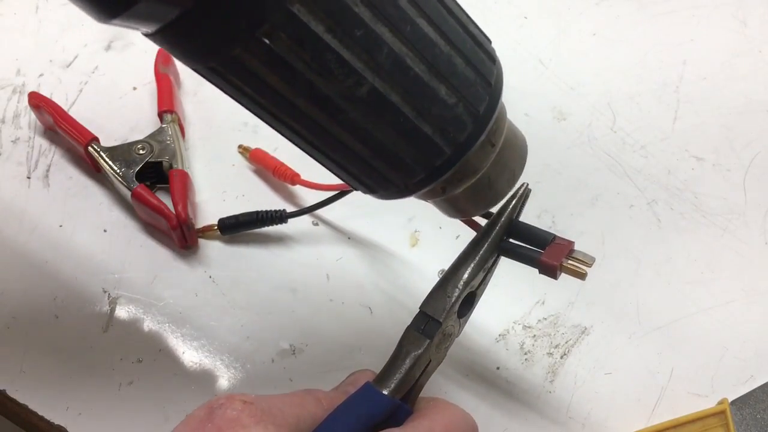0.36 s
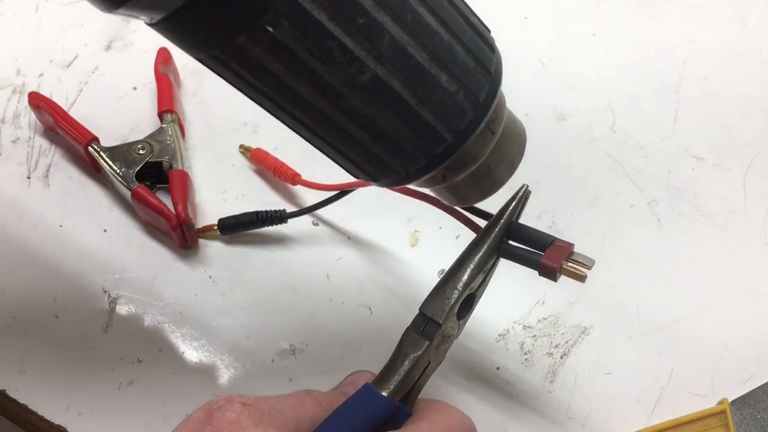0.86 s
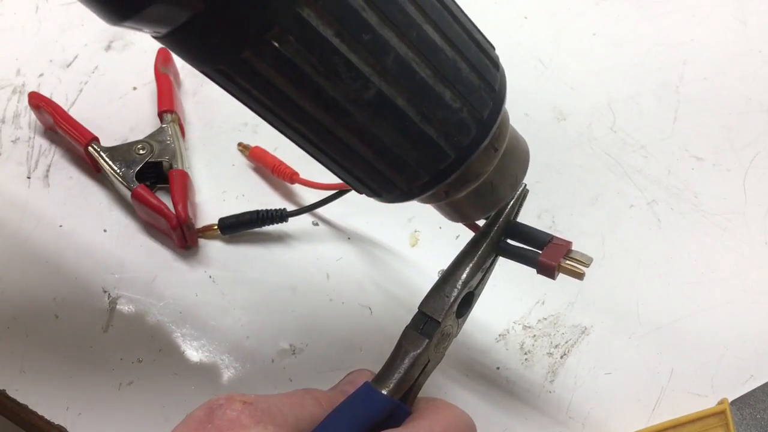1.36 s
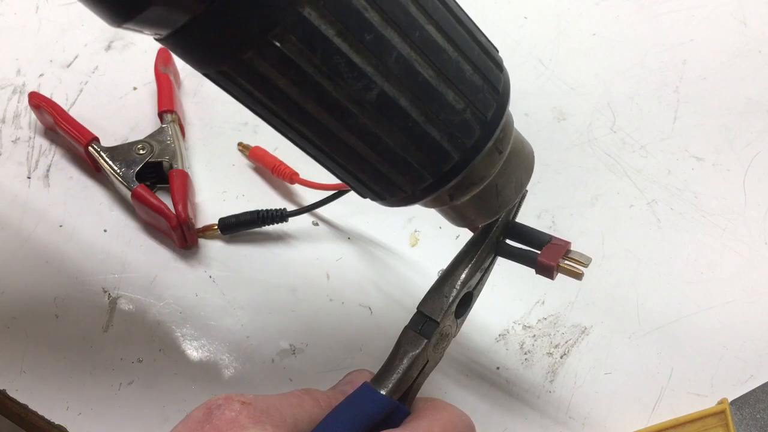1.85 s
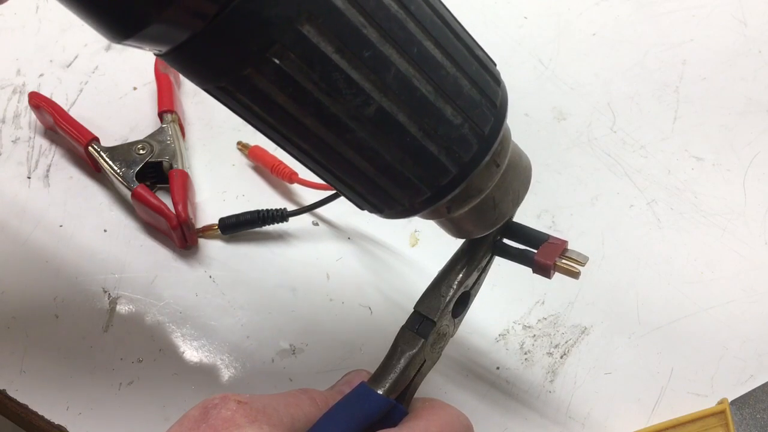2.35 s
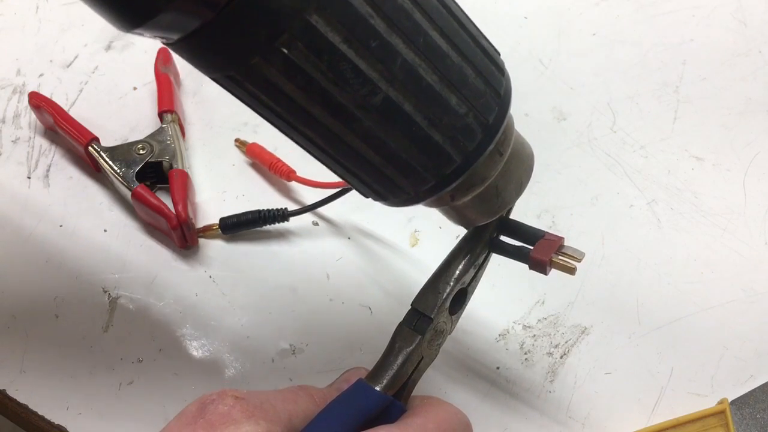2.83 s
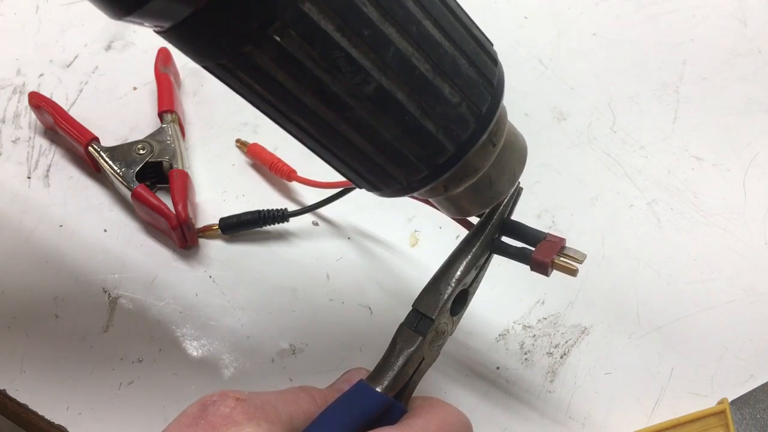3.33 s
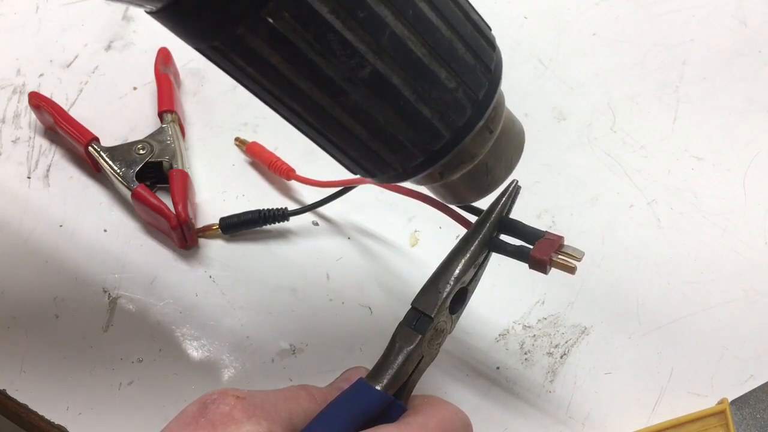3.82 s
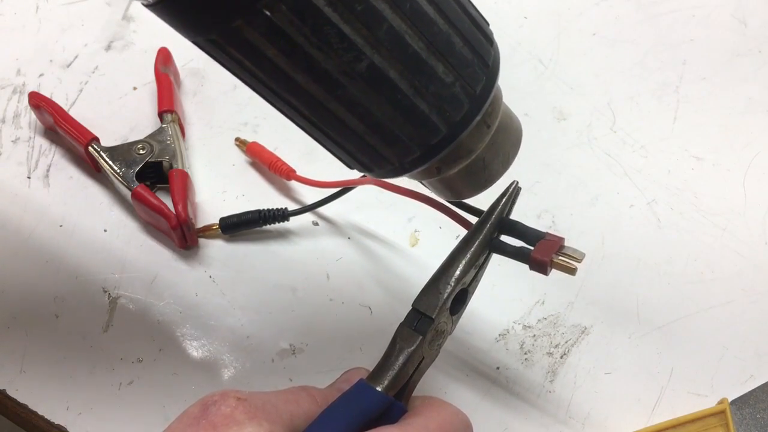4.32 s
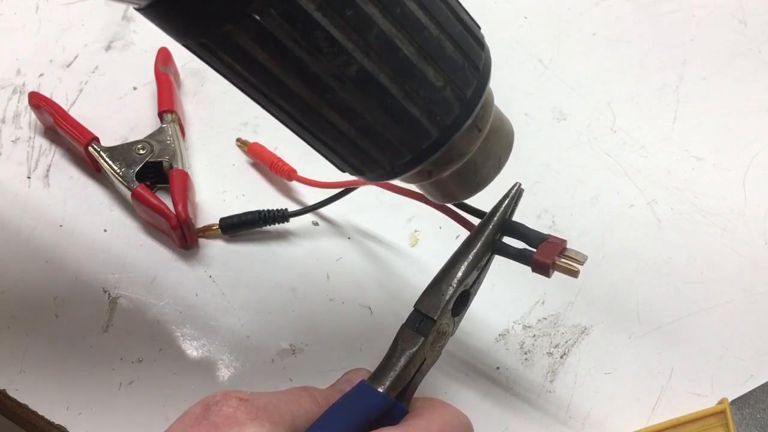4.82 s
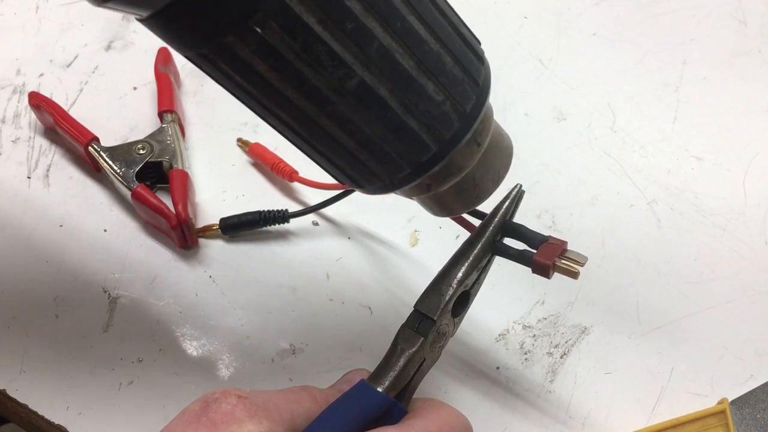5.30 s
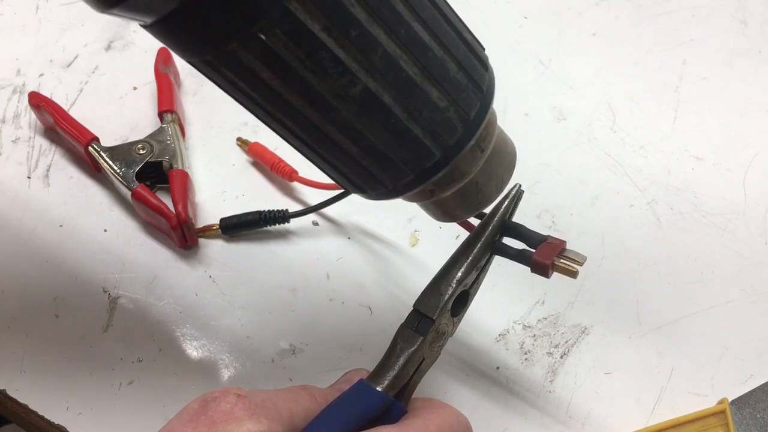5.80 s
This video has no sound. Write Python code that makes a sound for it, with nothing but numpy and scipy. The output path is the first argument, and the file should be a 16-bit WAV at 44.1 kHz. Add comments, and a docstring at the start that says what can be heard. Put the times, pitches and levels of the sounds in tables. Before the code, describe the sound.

Close mono sound of a hot-air blower at constant power: thick, breathy hiss and roar coloured by its barrel, with a low motor hum, a stronger mid-high whine and a fluttering, wavering undertone. Small changes in tone come as the tool is tilted. It starts and ends at full run, with no audible room echo.

```python
"""A steady, close roar of air with a singing motor tone: a hand-held heat gun over a workbench.
The motor slowly loses speed; sine waves at multiples of its shaft speed make the singing.
The rush is random noise, coloured by resonances of the barrel and housing.
A wavering swirl tone beats with the six fan blades, which also chop a narrow band of eddy noise."""
import sys
import numpy as np
from scipy import signal
from scipy.io import wavfile
from scipy.ndimage import uniform_filter1d

SR = 44100
rng = np.random.default_rng(int(sys.argv[2]) if len(sys.argv) > 2 else 0)


def volts_from_db(level):
    """Convert decibel levels to linear amplitude ratios."""
    exponent = np.asarray(level, float) / 20
    return 10 ** exponent


def pcm_store(signal):
    """Save signal as 16-bit PCM."""
    levels = np.round(np.clip(np.atleast_2d(signal), -1, 1) * 32767)
    wavfile.write(sys.argv[1], SR, levels.astype(np.int16).T)


N = 261072  # length in samples

# The motor sags as it warms, with brief recoveries.
# Each row: time in seconds, shaft speed in turns per second (Hz).
SHAFT_SPEED = [(0, 295.4), (.4, 294.92), (.85, 294.0), (1.1, 293.87), (1.28, 294.18), (1.55, 293.85),
               (1.9, 293.72), (2.1, 293.2), (2.4, 292.97), (2.56, 293.05), (2.9, 292.78), (3.2, 292.44),
               (3.7, 292.07), (4.0, 292.15), (4.35, 291.8), (5.2, 291.6), (5.92, 291.2)]
# The tone of the six passing blades (multiple 6) and its neighbours.
# Each row: multiple of shaft speed, level in dB at mid time, drift in dB per second,
# share of the hand's tilt that it follows (no unit).
BLADE_TONES = [(5, -37.8, -0.5, 0.23), (6, -32, 0., 0.85), (7, -41.5, -.6, 0.41)]
# The clearest whistles of the motor brushes.
# Each row: multiple of shaft speed, resting level in dB.
BRUSH_WHISTLES = [(37, -69.5), (38, -64.5), (39, -68.5), (42, -73), (44, -80.5)]
# The other shaft harmonics, with brush whine at the top.
# Each row: multiple of shaft speed, level in dB at mid time, drift in dB per second.
SHAFT_WHINE = [(1, -33.7, 0.2), (2, -55.5, 0.2), (3, -36.0, -0.1), (8, -58.9, 0.5), (9, -56.9, -0.3),
               (12, -52.0, -0.3), (13, -56.8, -0.7), (15, -52.1, -0.7), (16, -53.5, 1.3), (18, -53.4, -0.9),
               (19, -54.8, 0.6), (22, -56.5, -0.7), (23, -59.2, -0.0), (24, -58.2, -1.5), (27, -66.7, 0.3),
               (28, -65.8, 0.9), (29, -61.1, 0.8), (31, -63.3, -1.8), (32, -59.4, -1.0), (33, -64.4, -0.3),
               (34, -69.9, -2.0), (35, -67.0, 0.5), (41, -67.7, 0.3), (43, -67.6, -0.3), (45, -72.4, 2.1),
               (46, -72.8, -1.3), (47, -73.2, -1.2), (48, -74.7, -0.0), (49, -77.5, -0.1), (50, -77.1, 0.5),
               (51, -76.2, 0.3), (54, -82.1, 3.0), (55, -80.9, 2.2)]
# Swirl in the fan, heard alone (multiple 0) and beating with blade passes.
# Each row: multiple of shaft speed, sign with which the swirl frequency is added, level in dB.
SWIRL_TONES = [(0, 1, -36.5), (3, -1, -54), (5, -1, -51), (6, -1, -45.5), (7, -1, -54), (12, -1, -50.5),
               (12, 1, -49.5)]
# Eddies at the fan, one row: centre as a multiple of shaft speed, width setting in Hz,
# direct level in dB, mirrored level in dB (both before smoothing and gusts).
EDDY_BAND = (2.37, 45, -42, -41)
# Colour of the broad rush of air, before it is scaled as a whole.
# Each row: frequency in Hz, relative level in dB per Hz.
RUSH_COLOUR = [(20, -54), (32, -51), (45, -22.5), (110, -25), (230, -12), (420, -7), (800, -8), (1250, -7),
               (1600, -16), (2500, -16.5), (4300, -16.5), (6300, -20), (7700, -28), (10400, -31.5),
               (14000, -38), (17000, -43.5)]
# Air resonances of barrel and housing.
# Each row: centre in Hz, width in Hz, lift in dB (below zero it is a dip).
BARREL_RESONANCES = [(373, 73, 1), (602, 34, -0.5), (671, 70, 9), (740, 36, -2.5), (820, 60, 2),
                     (878, 88, 11), (973, 50, -0.5), (1044, 50, 8.5), (1106, 33, -4.5), (1160, 53, 2),
                     (1880, 32, -5.5), (1913, 283, 13.5), (2144, 68, 6), (2218, 120, -6.5),
                     (2930, 130, -3.5), (3100, 150, 4), (3400, 100, -1), (3620, 100, 4.5), (3930, 230, 4),
                     (4213, 79, 8), (4400, 54, 7), (4610, 115, 6.5), (5490, 510, 5), (5760, 220, 5),
                     (6290, 190, -3.5), (6660, 210, 3), (7030, 170, 5), (8430, 750, 7.5), (9240, 500, 3.5),
                     (10400, 400, -2.5), (11200, 850, 2.5)]
# The hand tilts the fan toward the microphone and away.
# Each row: time in seconds, lift in dB before each blade tone takes its share.
HAND_TILT = [(0, 2), (.7, 0.7), (1.3, 1), (1.65, -1.5), (3.2, -1.5), (3.85, -0.5), (4.15, 2.5), (4.5, 0.5),
             (4.9, 2), (5.92, 2)]
# Brush whistles swell for a while as the hand turns.
# Each row: multiple of shaft speed, middle in seconds, half length in seconds, lift in dB.
WHISTLE_SWELLS = [(37, .9, 1.4, 9), (38, .4, 1.2, 10), (38, 3.0, .7, 5), (38, 4.15, .6, 10),
                  (38, 5.8, .6, 4), (39, .9, 1.3, 11), (39, 3.3, 1.1, 8.5), (42, 2.7, .6, 5),
                  (42, 4.2, .7, 10), (42, 5.7, .8, 14), (44, 4.4, 1.3, 17), (44, 5.9, .4, 8)]

SWIRL_RATIO = 1.248  # swirl frequency over shaft speed
SWIRL_FADE_DB = -0.5  # dB per second, as the motor slows
RUSH_DB = -31  # level of the rush above 2.2 kHz
# Aim of the nozzle as it swings aside: change in dB at mid time, and drift in dB per second.
LOW_DB, LOW_DRIFT_DB = -0.3, 0.02
HIGH_DB, HIGH_DRIFT_DB = 1.0, -0.17


def read(points, hz):
    """Joins spectrum points by straight lines on a log-frequency axis."""
    f, value = np.transpose(points)
    return np.interp(np.log(hz + 1), np.log(f + 1), value)


def evened(x):
    """Scales to an rms (average strength) of 1."""
    return x / np.sqrt(np.mean(x ** 2) + 1e-20)


def wander(rate_hz):
    """Smooth random curve of rms about 1 that changes about rate_hz times a second."""
    spacing = 200  # samples between random points
    knots = rng.standard_normal(N // spacing + 2)
    cutoff = np.clip(rate_hz * spacing / SR * 2, 1e-4, 0.9)
    smooth = signal.lfilter(*signal.butter(1, cutoff), knots)
    return np.interp(np.arange(N) / spacing, np.arange(len(knots)), evened(smooth))


def tone(turns, level_db):
    """A sine of given rms level and random starting phase; turns counts its cycles."""
    return np.sqrt(2) * volts_from_db(level_db) * np.cos(2 * np.pi * (turns + rng.random()))


def air():
    """Turbulent noise through the barrel resonances, louder and softer in drifting patches."""
    frames, hz = N // 512 + 5, np.fft.rfftfreq(2048, 1 / SR)
    real, imag, small, large = rng.standard_normal((frames, 1025, 4)).T
    # blur random grids over time (axis 1) and frequency (axis 0) into patches
    small = uniform_filter1d(small, size=8, axis=0)
    small = evened(uniform_filter1d(small, size=6, axis=1))
    large = uniform_filter1d(large, size=10, axis=0)
    large = evened(uniform_filter1d(large, size=70, axis=1))

    colour_db = read(RUSH_COLOUR, hz)
    for centre_hz, width_hz, lift_db in BARREL_RESONANCES:
        colour_db = colour_db + lift_db / (1 + (2 * (hz - centre_hz) / width_hz) ** 2)

    t = np.arange(frames) * 512 / SR
    t = t - t.mean()
    high = (hz ** 2 / (hz ** 2 + 2200 ** 2))[:, None]  # 0 in the bass, near 1 in the treble
    low_aim_db = LOW_DB + LOW_DRIFT_DB * t
    high_aim_db = HIGH_DB + HIGH_DRIFT_DB * t
    aim_db = (1 - high) * low_aim_db + high * high_aim_db

    level_db = colour_db[:, None] + aim_db + 0.91 * small + 0.68 * large
    spectrum = (real + 1j * imag) * volts_from_db(level_db)
    rush = signal.istft(spectrum, nperseg=2048, noverlap=1536)[1][:N]
    highpass = signal.butter(8, 2200, "high", fs=SR, output="sos")
    upper = signal.sosfiltfilt(highpass, rush)
    return volts_from_db(RUSH_DB) * rush / np.std(upper)


def eddies(turns):
    """A narrow band of eddy noise that the six blades chop, mirroring it below the blade tone."""
    ratio, width_hz, direct_db, mirror_db = EDDY_BAND
    parts = [wander(width_hz / 2), wander(width_hz / 2)]
    real, imag = uniform_filter1d(parts, size=500)  # gives the band steep flanks
    gusts = volts_from_db(1.9 * wander(4.5))
    eddy = gusts * (real + 1j * imag) * np.exp(2j * np.pi * ratio * turns)
    mirror = np.conj(eddy) * np.exp(2j * np.pi * 6 * turns)
    return (volts_from_db(direct_db) * eddy + volts_from_db(mirror_db) * mirror).real


def swirl(turns):
    """A tone whose pitch and strength never settle, and its beats with the blades."""
    pitch_wander_hz = 5.5 * wander(12.0)
    swirl_turns = SWIRL_RATIO * turns + np.cumsum(pitch_wander_hz) / SR
    fade_db = SWIRL_FADE_DB * (np.arange(N) - N / 2) / SR
    swell_db = fade_db + 1.64 * wander(5.3)
    out = np.zeros(N)
    for multiple, sign, db in SWIRL_TONES:
        out += tone(multiple * turns + sign * swirl_turns, db + swell_db)
    return out


def motor(turns):
    """Harmonics of the shaft; each fades in and out as reflections shift."""
    t = np.arange(N) / SR
    from_middle = t - t.mean()
    tilt_db = np.interp(t, *np.transpose(HAND_TILT))
    out = np.zeros(N)
    for multiple, db, drift_db, share in BLADE_TONES:
        level_db = db + drift_db * from_middle + share * tilt_db
        flutter_db = 1.37 * wander(16.0)  # uneven inflow
        out += tone(multiple * turns, level_db + flutter_db)

    for multiple, db in BRUSH_WHISTLES:
        lift_db = np.zeros(N)
        for which, middle, half_length, up_db in WHISTLE_SWELLS:
            if which == multiple:
                lift_db += up_db * np.exp(-((t - middle) / half_length) ** 2)
        out += tone(multiple * turns, db + lift_db + 1.4 * wander(16.0))

    for multiple, db, drift_db in SHAFT_WHINE:
        sway_db = 0.06 * multiple * wander(0.8)  # short waves feel the hand's sway most
        level_db = db + drift_db * from_middle + sway_db
        out += tone(multiple * turns, level_db + 0.83 * wander(9.0))
    return out


def scene():
    """Motor tones, swirl and eddies, all tied to one shaft, over the rush of air."""
    speed_hz = np.interp(np.arange(N) / SR, *np.transpose(SHAFT_SPEED))
    speed_hz = speed_hz + 0.09 * wander(6.1)  # slight unsteadiness
    turns = np.cumsum(speed_hz) / SR
    return (air() + eddies(turns) + swirl(turns) + motor(turns))[None]


def top_cut(x):
    """Nothing passes above the cut-off."""
    return signal.sosfilt(signal.butter(12, 17090, fs=SR, output="sos"), x)


def record(dry):
    """The microphone drops the deepest bass; a band limit cuts the treble sharply near 17.1 kHz."""
    bass_cut = signal.butter(3, 38, "high", fs=SR, output="sos")
    mix = signal.sosfilt(bass_cut, dry)
    band_limit = signal.firwin(511, 17120, window=("kaiser", 9), fs=SR)
    mix = signal.oaconvolve(mix, band_limit[None], "same")
    return top_cut(mix)


dry = scene()
out = record(dry)
pcm_store(out)
```